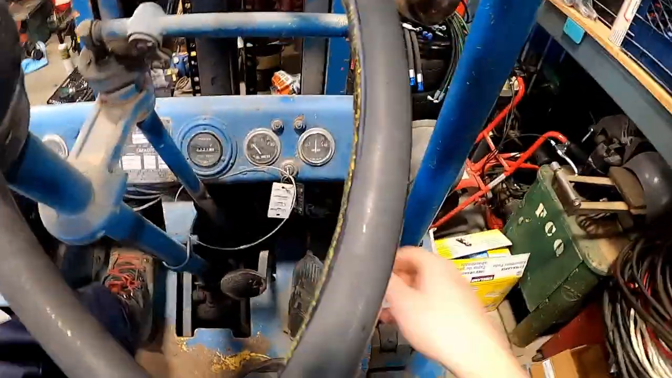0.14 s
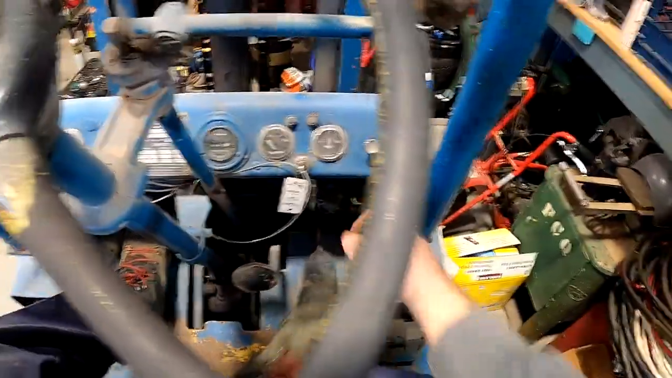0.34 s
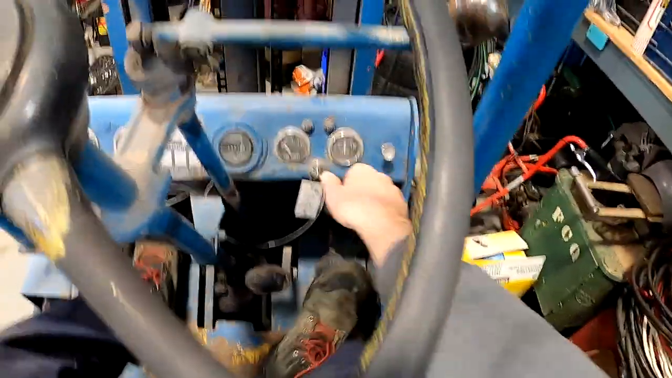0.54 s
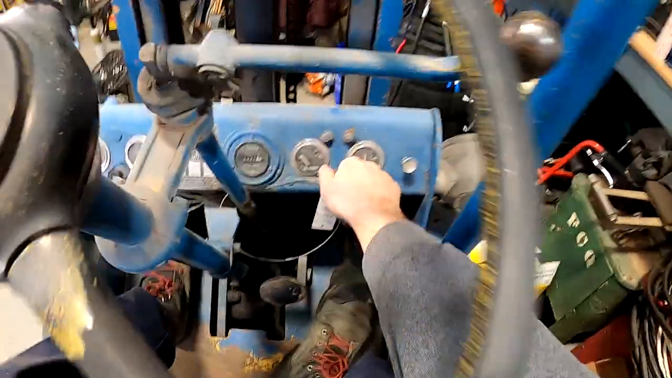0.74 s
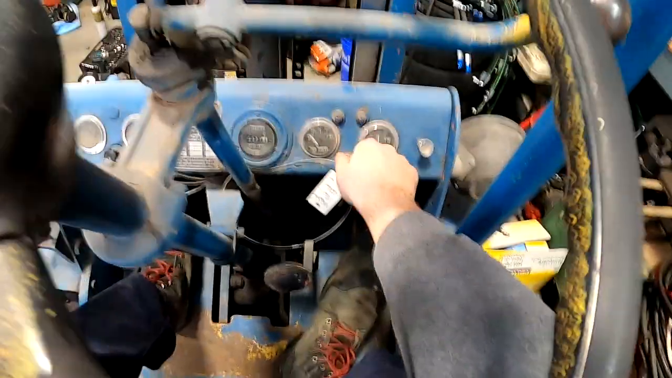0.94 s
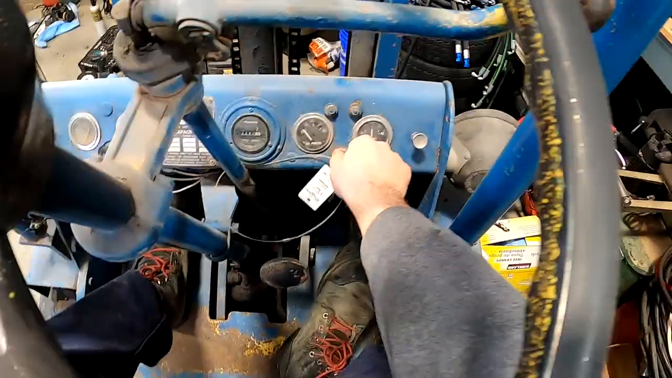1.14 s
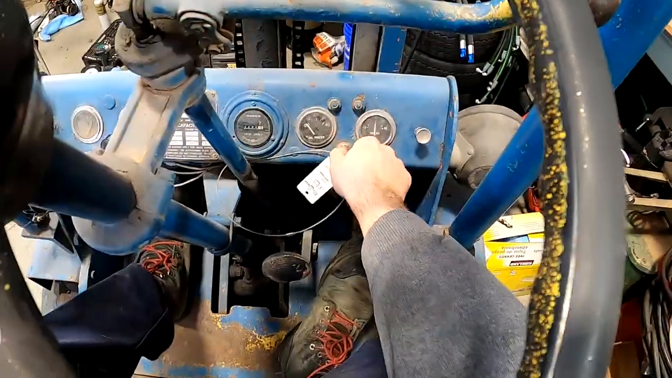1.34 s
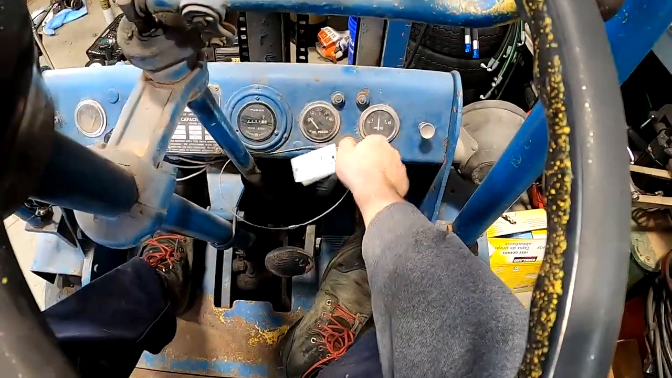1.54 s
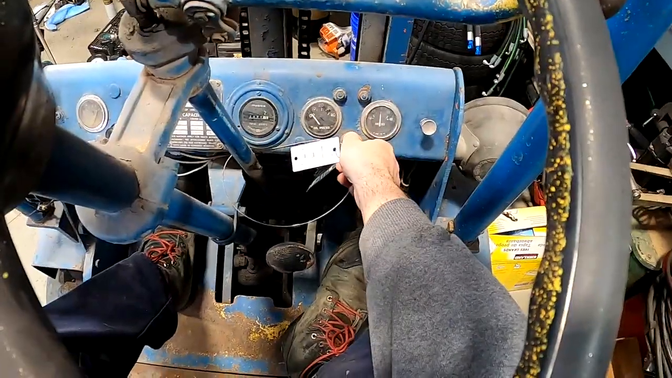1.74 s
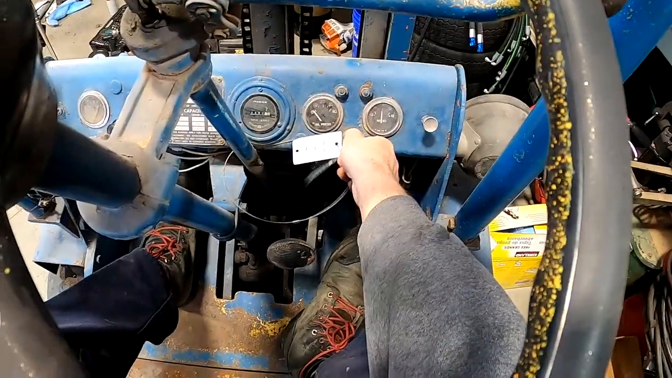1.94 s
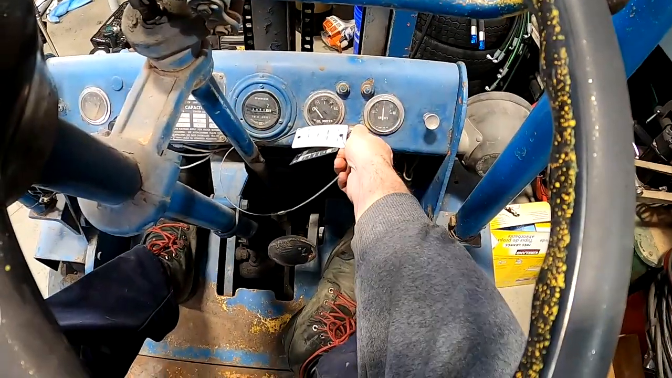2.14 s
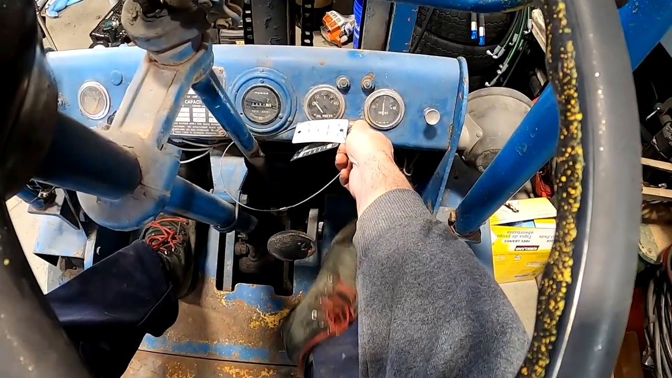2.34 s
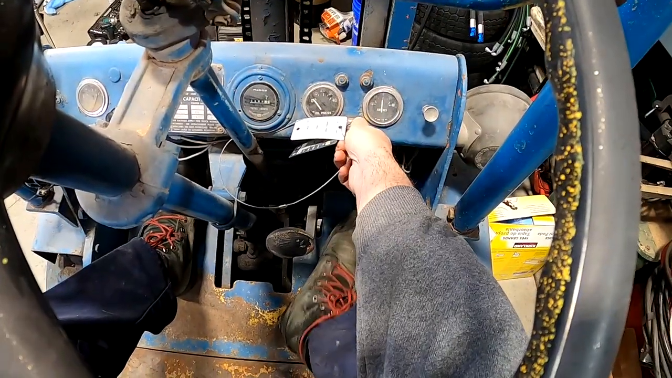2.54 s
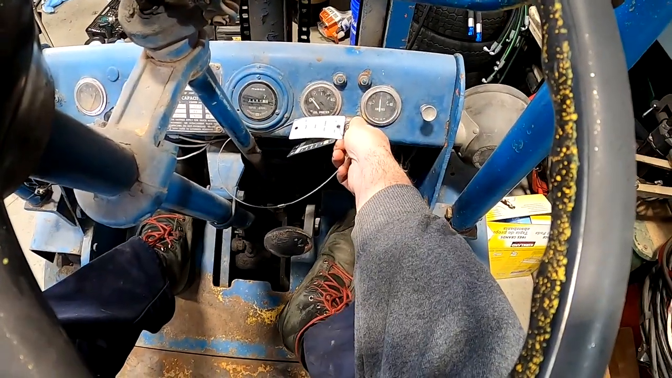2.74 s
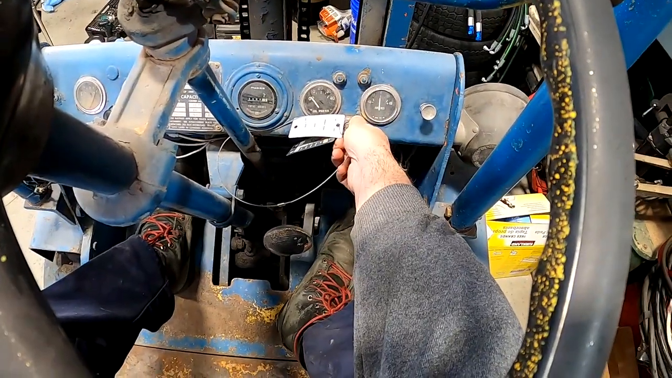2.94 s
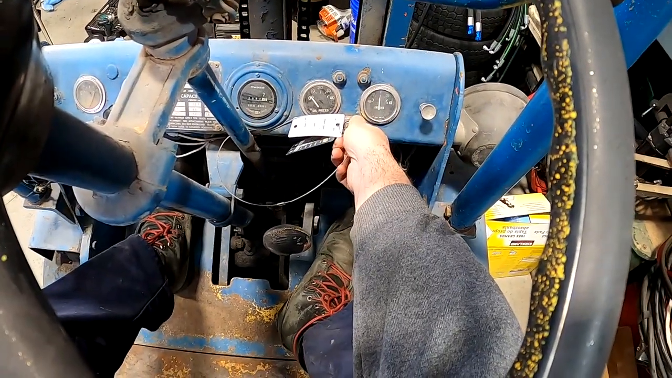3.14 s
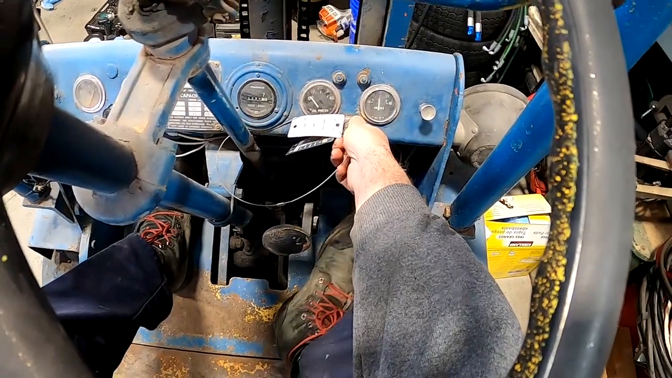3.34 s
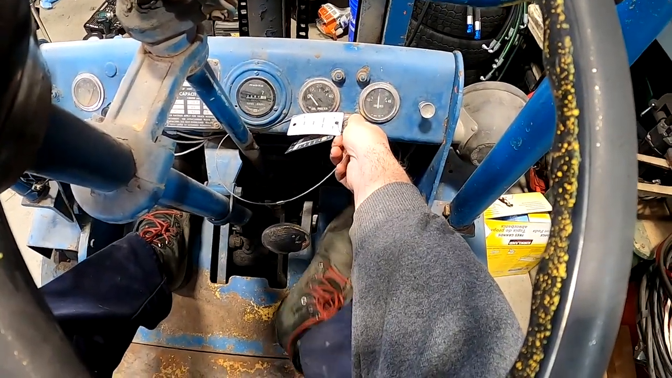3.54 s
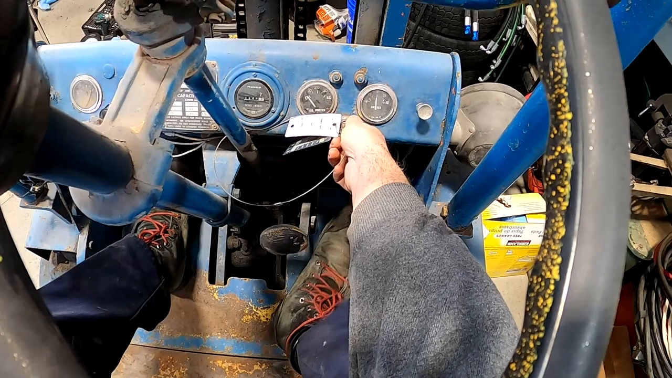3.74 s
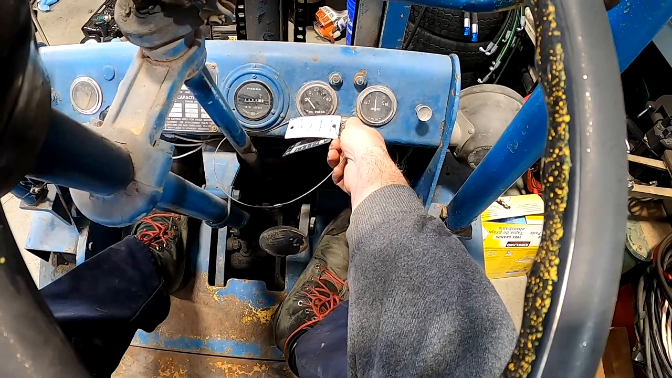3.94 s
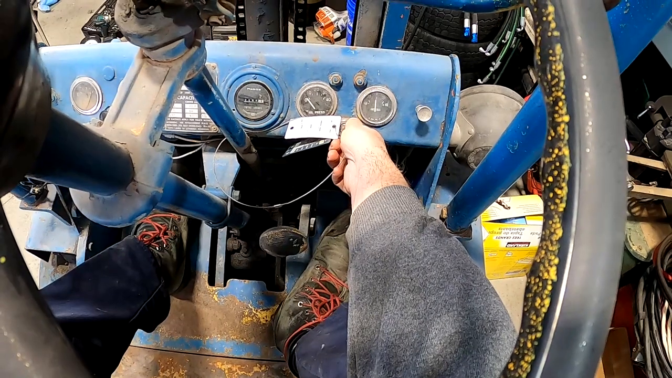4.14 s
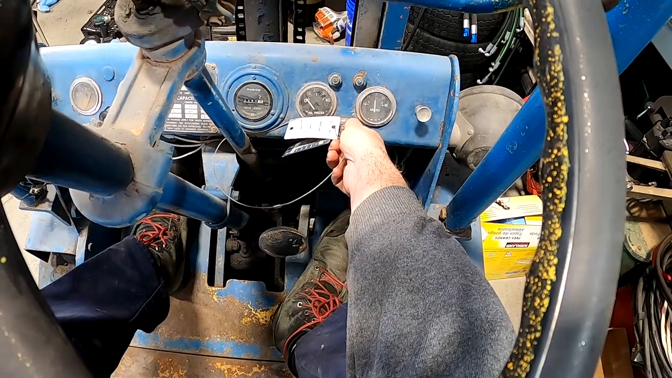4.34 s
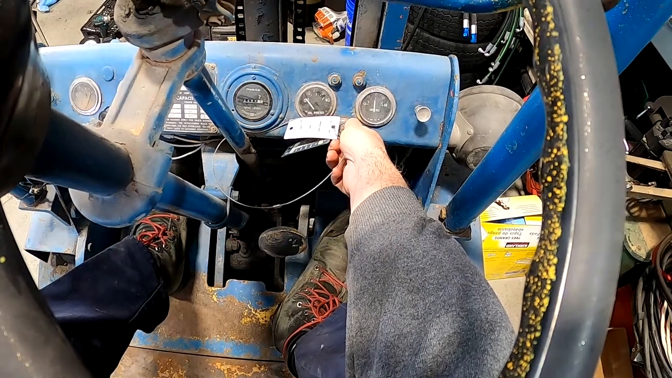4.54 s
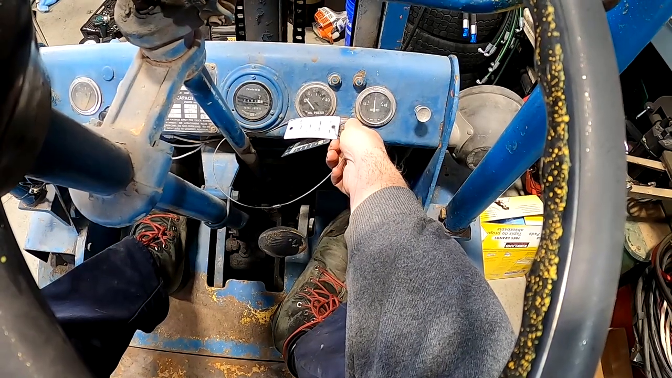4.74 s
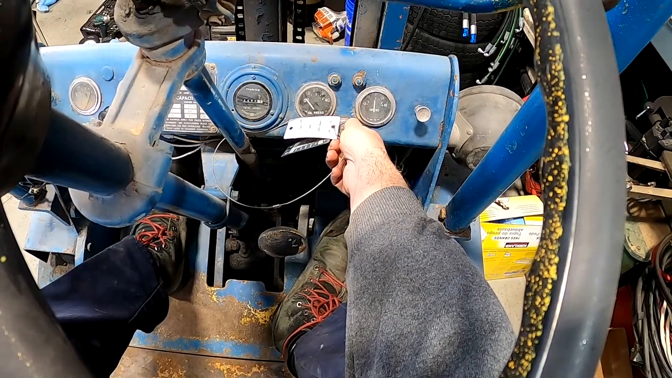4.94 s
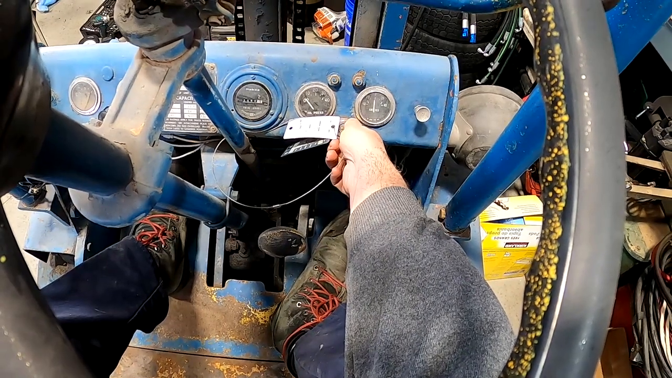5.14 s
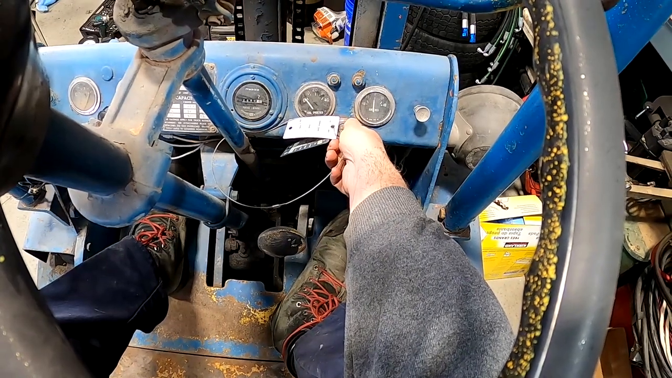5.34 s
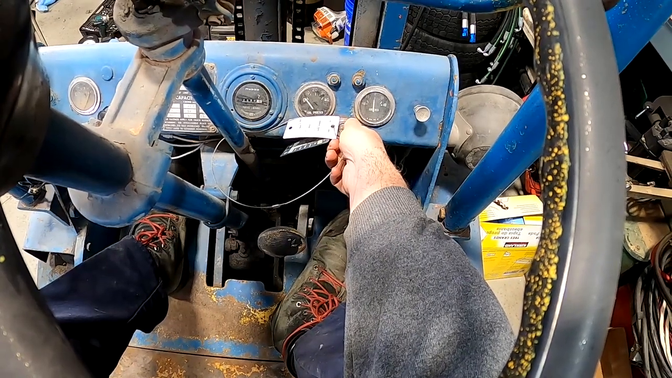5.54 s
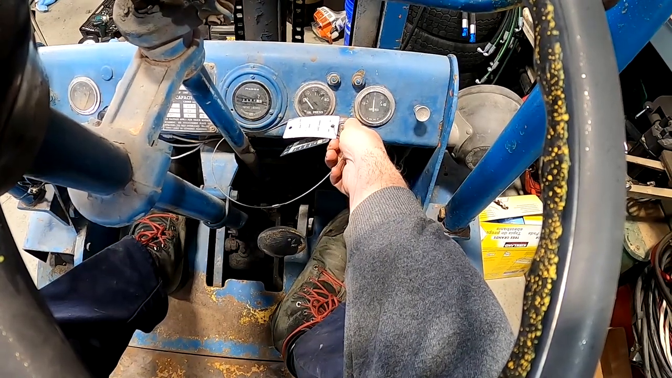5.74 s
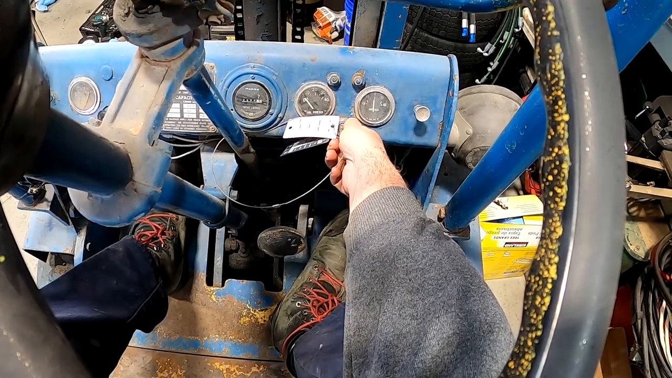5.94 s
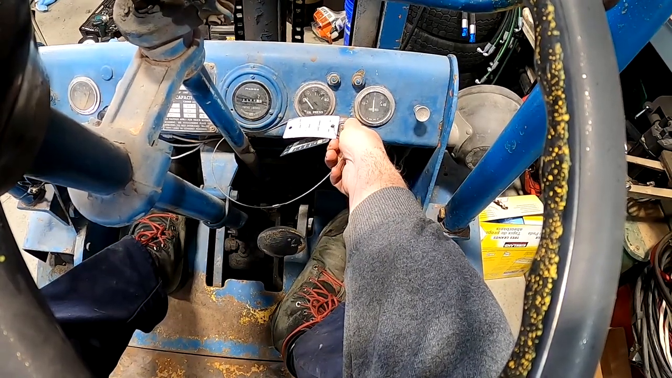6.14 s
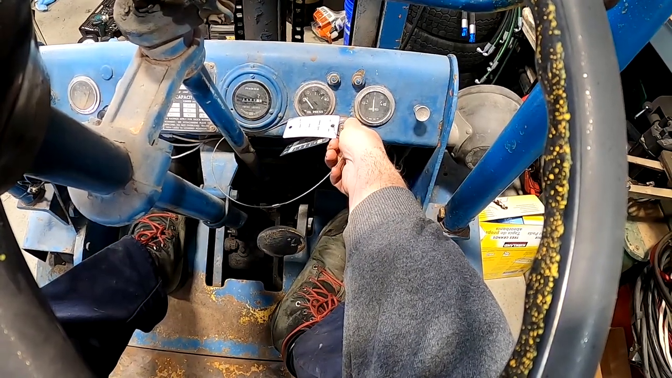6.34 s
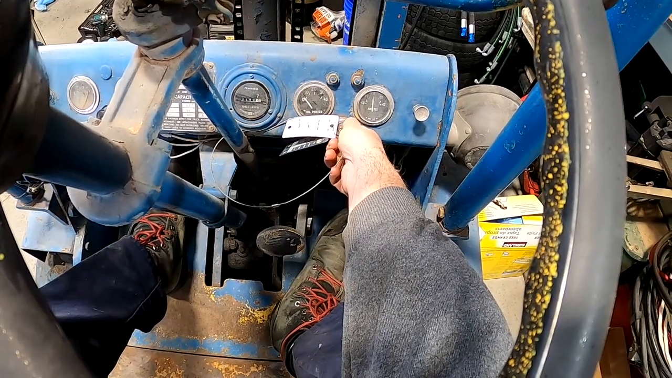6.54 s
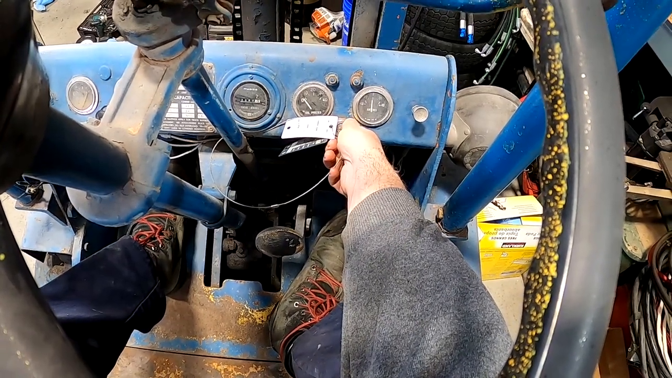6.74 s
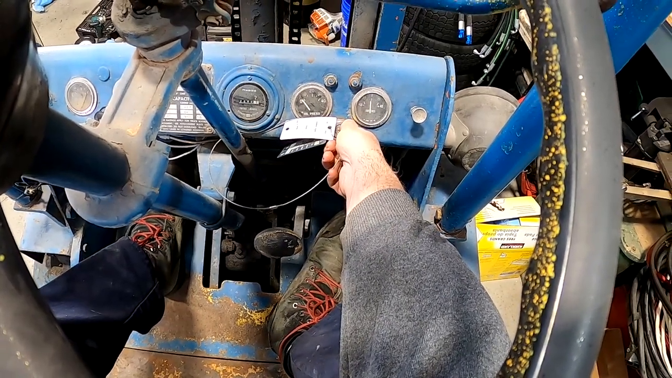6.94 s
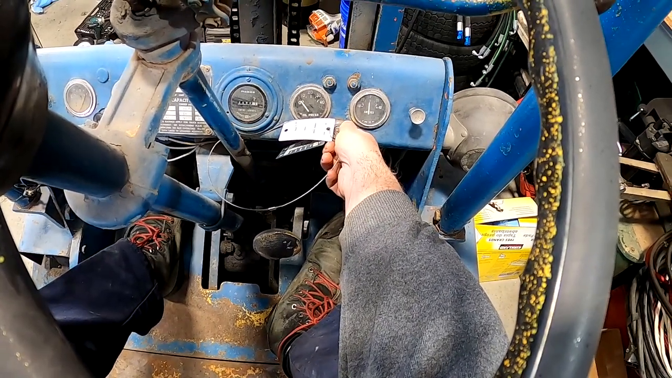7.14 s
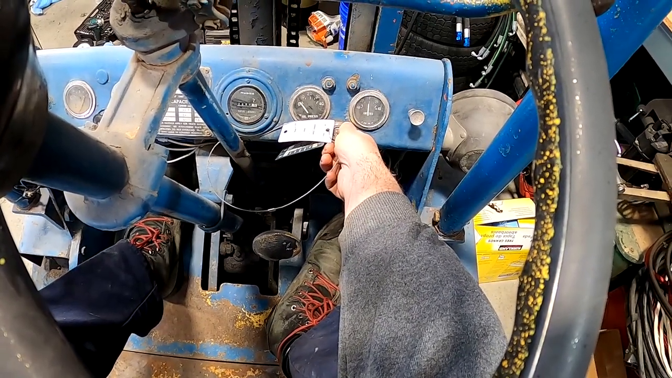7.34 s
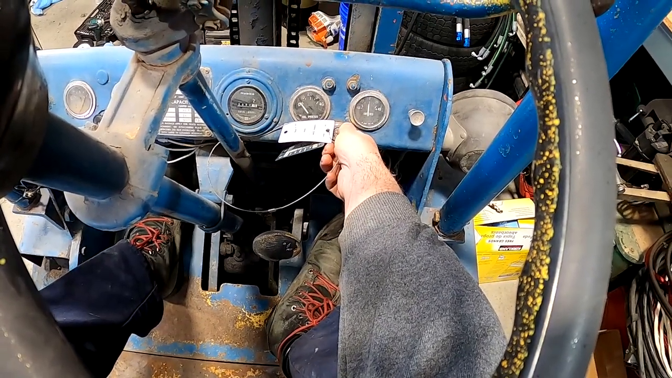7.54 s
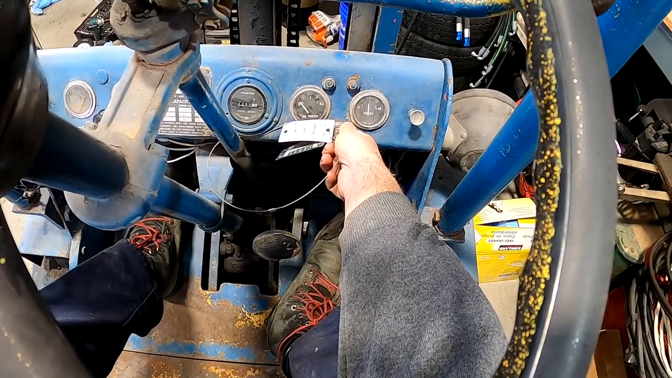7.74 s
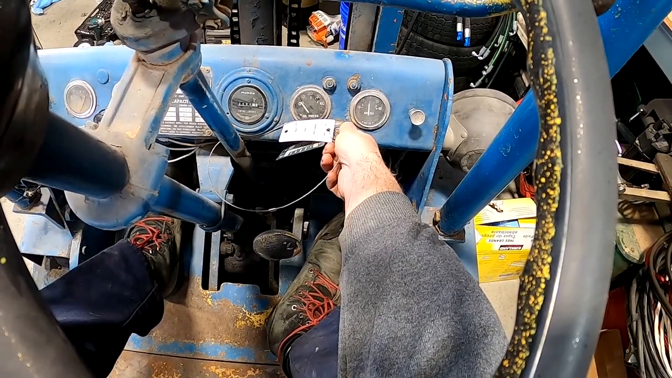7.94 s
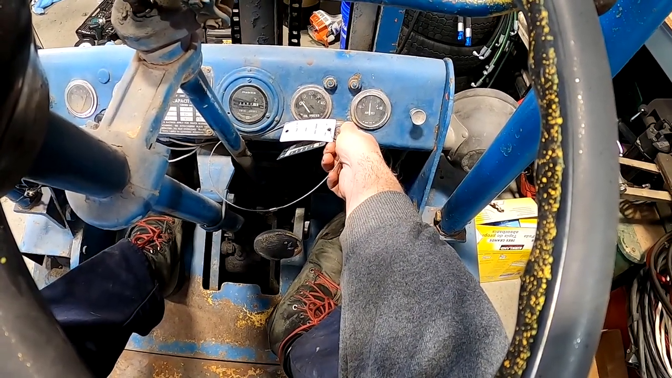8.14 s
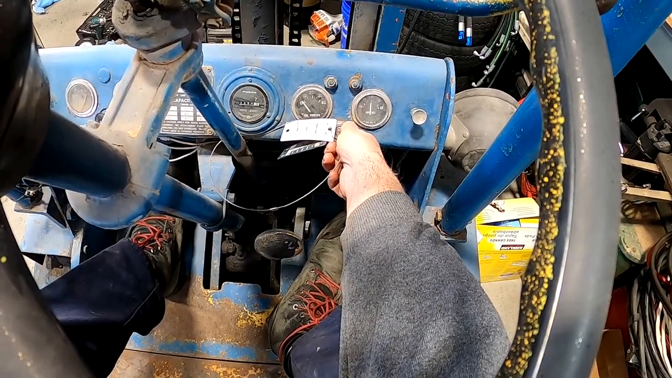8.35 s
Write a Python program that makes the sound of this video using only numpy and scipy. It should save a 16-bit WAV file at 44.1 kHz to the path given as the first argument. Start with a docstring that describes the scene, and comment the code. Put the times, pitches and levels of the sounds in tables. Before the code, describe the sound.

Close up in a cluttered garage, clothing rustles and a boot and hand knock a metal floor plate and dash. A sharp clack follows, then a starter engages with a metallic slam, runs up, and grinds steadily, whining and pulsing nearly six times a second with soft exhaust puffs. The engine never catches. Nearly mono, close microphone, faint hiss.

```python
"""A cluttered garage, a small industrial truck, and a starter motor whose engine does not catch.
Close by, clothes rustle (shaped noise) and a boot and hand knock plate and dash (ringing modes and short noise).
The key switch then pulls in a fuel valve with a clack, a solenoid follows and the pinion slams in (struck modes).
Last the pinion grinds the ring gear round (tooth-rate overtones, noise, resonances), slowing on each compression,
and the exhaust puffs once a stroke. The nearly mono pair of microphone ports adds faint self-noise."""
import sys
import numpy as np
from scipy import signal
from scipy.fft import rfft, irfft, next_fast_len
from scipy.io import wavfile
from scipy.ndimage import uniform_filter1d, map_coordinates

SR = 44100
rng = np.random.default_rng(int(sys.argv[2]) if len(sys.argv) > 2 else 0)


def digitize_waveform(pressure):
    """Quantize a signal to 16-bit integers and store it at the path in sys.argv[1].

    Rows of a 2-D input are taken as channels; values are limited to [-1, 1].
    """
    field = np.atleast_2d(pressure).T
    bounded = np.clip(field, -1, 1)
    quanta = np.round(bounded * 32767).astype(np.int16)
    wavfile.write(sys.argv[1], SR, quanta)


N = 374850
NOW_S = np.arange(N) / SR
START_S = 1.87  # the starter motor begins to turn


def amp(db):
    """dB to gain."""
    return 10 ** (np.asarray(db) / 20)


def unit(x):
    """Scaled to rms 1."""
    return x / np.sqrt(np.mean(x ** 2) + 1e-20)


def noise(length=N):
    """White noise, rms about 1."""
    return rng.standard_normal(length)


def along(points, hz):
    """Reads (frequency, value) points on a log frequency axis."""
    f, v = np.transpose(points)
    return np.interp(np.log(hz + 1), np.log(f + 1), v)


def curves(rows, at=NOW_S):
    """One value per sample for each column after the first."""
    s, *columns = np.transpose(rows)
    return [np.interp(at, s, column) for column in columns]


def wobble(rate):
    """A smooth random curve, rate knots a second."""
    knots = noise(int(N * rate / SR) + 4)
    return map_coordinates(knots, [np.arange(N) * rate / SR])


def filtered(x, response):
    """x times a response of frequency."""
    m = next_fast_len(N + SR // 2)
    return irfft(rfft(x, m) * response(np.fft.rfftfreq(m, 1 / SR)), m)[..., :N]


def coloured(x, spectrum):
    """x shaped by a spectrum, rms 1."""
    return unit(filtered(x, lambda hz: amp(along(spectrum, hz))))


def tail(decays, seconds):
    """A noise tail of energy 1, each frequency dying at its own speed (t60)."""
    hz, t, z = signal.stft(noise(int(seconds * SR)), SR, nperseg=256)
    fade = amp(-60 * t / along(decays, hz)[:, None])
    y = signal.istft(z * fade, SR, nperseg=256)[1]
    return y / np.linalg.norm(y)


def ring(modes, t, attack, rough_hz):
    """Modes of a struck thing, neighbours in opposite phase; a wandering phase blurs the higher ones."""
    drift = np.cumsum(rng.standard_normal((len(modes), len(t))), axis=1) * np.sqrt(rough_hz / SR)
    total = np.zeros(len(t))
    for k, (hz, db, t60) in enumerate(modes):
        level = amp(db + rng.normal(0, 1) - 60 * t / t60)
        total += (-1) ** k * level * np.sin(2 * np.pi * hz * t + drift[k] * hz / 1000)
    return (1 - np.exp(-t / attack)) * total


def singing(hz, width, db):
    """A loosely held resonance: narrow noise around a pitch that may move."""
    slow = [filtered(noise(), lambda f: 1 / (1 + (2 * f / width) ** 2)) for _ in range(2)]
    turn = 2 * np.pi * np.cumsum(hz) / SR
    return amp(db) * unit(slow[0] * np.cos(turn) + slow[1] * np.sin(turn))


def drone(hz, width, db, steady):
    """A lightly damped panel: narrow noise plus a steady tone whose phase wanders."""
    narrow = unit(filtered(noise(), lambda f: 1 / (1 + (2 * (f - hz) / width) ** 2)))
    tone = np.sin(2 * np.pi * hz * NOW_S + 1.41 * wobble(8))
    return amp(db) * (narrow + steady * tone)


def add(track, s, sound):
    """Mixes a sound into the track at time s."""
    part = track[round(s * SR):][:len(sound)]
    part += sound[:len(part)]


# dull air and cloth spectrum, also the low part of the rustle: hz, relative_db (per Hz)
DULL_SPECTRUM = [(15, -31), (25, 0), (162, -2), (261, 1.5), (468, -2), (546, -2), (595, -3), (977, -18),
                 (1500, -25), (1950, -21), (3300, -120)]


def room_tone():
    """The quiet garage never falls fully silent: a steady bed of dull noise."""
    return amp(-75.5) * coloured(noise(), DULL_SPECTRUM)


# how the garage dies away: hz, t60_s
GARAGE_DECAY = [(200, 0.53), (2000, 0.88), (10000, 0.17)]


def garage_echo(blows):
    """The walls answer the blows about 11 ms later with a dying noise tail."""
    late_tail = np.pad(tail(GARAGE_DECAY, .9), (500, 0))
    return amp(-15.0) * signal.fftconvolve(blows, late_tail)[:N]


# side signal against mid: hz, side_db
SIDE_SPREAD = [(60, -31), (200, -59), (700, -84), (2300, -76), (4300, -55), (8000, -30), (14000, -22)]
# microphone self-noise, unlike in the two ports: hz, relative_db (per Hz)
SELF_NOISE = [(18, -29), (30, 9), (149, 1), (411, -14), (1700, -18), (11200, -11), (13000, -17)]


def two_channels(mid):
    """Two nearly alike channels: a briefly smeared copy of the sound, shaped by frequency, and microphone self-
    noise are added to one channel and taken from the other."""
    smeared = signal.fftconvolve(mid, tail([(200, 0.01), (10000, 0.027)], .05))[:N]
    side = filtered(smeared, lambda hz: amp(along(SIDE_SPREAD, hz)))
    side += amp(-82.5) * coloured(noise(), SELF_NOISE)
    return np.array([mid + side, mid - side])


# course of the rustle before random sway: start_s, low_level_db, high_level_db
RUSTLE_COURSE = [(0.0, -64, -66), (0.218, -65, -65), (0.42, -65, -66.5), (0.5, -56, -60.5),
                 (0.625, -62, -63.5), (0.66, -54, -73), (0.696, -61, -69), (0.78, -68, -72.5),
                 (1.192, -77, -78.5), (1.452, -71, -80), (1.588, -66.5, -72), (1.698, -69, -77),
                 (1.87, -66, -76)]
# crisp high part of the rustle: hz, relative_db (per Hz)
CLOTH_SPECTRUM = [(470, -26), (800, 3), (1960, -8), (2160, -8.5), (2630, -7), (3440, -10), (3890, -9.5),
                  (4350, -10.5), (15000, -18.5)]
# two faint whistling bands in the first rustle: start_hz, rise_hz_per_s, width_hz, level_db
CLOTH_WHISTLES = [(2350, 900, 90, -81), (3700, 800, 110, -76)]
WHISTLE_S, WHISTLE_LENGTH_S = .25, .16  # middle, half length


def clothes():
    """Rubbing cloth: a dull and a crisp noise swell and settle together, with faint rising whistles."""
    low_db, high_db = curves(RUSTLE_COURSE)
    sway = wobble(3.6)
    low = amp(low_db + .8 * sway + 1.8 * wobble(30)) * coloured(noise(), DULL_SPECTRUM)
    high = amp(high_db + .6 * sway + 1.2 * wobble(40)) * coloured(noise(), CLOTH_SPECTRUM)
    swell = np.exp(-((NOW_S - WHISTLE_S) / WHISTLE_LENGTH_S) ** 2)
    whistles = sum(singing(hz + rise * np.minimum(NOW_S, 1), width, db)
                   for hz, rise, width, db in CLOTH_WHISTLES)
    return low + high + swell * whistles


# boot and hand contacts: start_s, plate_level_db, thud_level_db, thud_hz, scuff_level_db, length_s
CONTACTS = [(0.411, -39, -46, 330, -60, 0.014), (0.427, -40, -46, 330, -48, 0.02),
            (0.436, -39, -45, 330, -48, 0.02), (0.448, -50, -54, 330, -68, 0.018),
            (0.637, -50, -48, 1100, -54, 0.05), (0.648, -54, -47, 1250, -54, 0.04),
            (0.718, -64, -62, 600, -80, 0.015), (0.867, -71, -60, 850, -80, 0.022),
            (0.944, -76, -68, 1600, -70, 0.03), (1.029, -74, -70, 2200, -65, 0.025),
            (1.662, -66, -56, 850, -82, 0.022)]
# modes of the floor plate, before the extra damping of the knock: pitch_hz, level_db, t60_s
PLATE_MODES = [(106, -9, 0.23), (164, -2.5, 0.46), (269, 0.5, 0.15), (413, 6.5, 0.087), (627, -9, 0.2),
               (907, -11, .3), (1237, -11, 0.29), (1790, -12, 0.19)]
THUD_WIDTH_HZ = 920


def boot_and_hand():
    """Each contact rings the floor plate, thuds as damped resonant noise and scuffs as high noise."""
    out, t = np.zeros(N), np.arange(SR // 3) / SR
    pole = np.exp(-np.pi * THUD_WIDTH_HZ / SR)
    for s, plate_db, thud_db, thud_hz, scuff_db, length in CONTACTS:
        fade = np.exp(-3 * t / max(length, .002))
        resonator = [1, -2 * pole * np.cos(2 * np.pi * thud_hz / SR), pole ** 2]
        thud = unit(signal.lfilter([1], resonator, noise(len(t)))) * fade
        scuff = signal.lfilter([.2], [1, -1.5, .66], np.diff(noise(len(t) + 1))) * fade
        plate = ring(PLATE_MODES, t, 0.00039, rough_hz=306) * amp(-60 * t / 0.16)
        add(out, s, amp(plate_db) * plate + amp(thud_db) * thud + amp(scuff_db) * scuff)
    return out


# key contact, fuel valve, solenoid: start_s, crack_level_db, ring_level_db
PLUNGER_CLACKS = [(1.414, -81.5, -46), (1.4294, -27, -25.5), (1.869, -35.5, -53.5)]
# modes of the bracket they shake: pitch_hz, level_db, t60_s
BRACKET_MODES = [(388, -1, .07), (430, 0, .07), (1640, -25, .08), (2520, -30, .35), (2780, -30, .45),
                 (3250, -28, .1), (4210, -29, .2), (4554, -29, .35), (5510, -25, .17), (6450, -31, .25),
                 (7310, -28, .3), (8150, -29, .25)]


def solenoids():
    """Steel plungers land with a short rattle and shake their bracket."""
    out, t = np.zeros(N), np.arange(SR // 3) / SR
    for s, crack_db, ring_db in PLUNGER_CLACKS:
        rattle = signal.lfilter([1, -1], [1, -.9, .35], noise(len(t)))
        # the upper bracket modes sound in the crack too
        crack = 0.5 * rattle + 9 * ring(BRACKET_MODES[2:], t, .001, rough_hz=80)
        crack *= (1 - np.exp(-t / 0.003)) * amp(-60 * t / 0.048)
        add(out, s, amp(crack_db) * crack)
        add(out, s + 0.0045, amp(ring_db) * ring(BRACKET_MODES, t, 0.0015, rough_hz=45))
    return out


# modes of the struck ring gear: pitch_hz, level_db, t60_s
RING_GEAR_MODES = [(533, 1, .07), (950, -8, .05), (1480, 2, 0.052), (2110, -12, .06)]


def pinion_landing():
    """The pinion slams into the ring gear, which rings briefly."""
    out, t = np.zeros(N), np.arange(SR // 3) / SR
    add(out, 1.899, amp(-30.5) * ring(RING_GEAR_MODES, t, 0.0025, rough_hz=100))
    return out


STROKE_COUNT, EARLY_STROKE_S, FIRST_STROKE_S = 37, 2.075, 2.275
STROKE_S, LONGER_S = .16275, .00059  # basic stroke length, growth per stroke as the battery tires
LAG_S, LAG_STROKES = .0582, 1.2  # time lost while the crank gets going, over about so many strokes
EARLY_PUFF_DB, FIRST_PUFF_DB = -63, -40.5
PUFF_DB, PUFF_FADES_DB, PUFF_SCATTER_DB = -43, 0.07, 0.5  # later puffs, loss per stroke, chance
HOOD_DB, HOOD_LATE_DB, HOOD_STROKES = 4.5, 5, 12.5  # the hood ring grows by HOOD_LATE_DB as cranking slows
HOOD_ALTERNATES_DB, HOOD_SCATTER_DB = 1.3, 0.73  # every other stroke rings the hood harder
WHINE_SCATTER_DB = .7
EARLY_HOOD_DB, EARLY_WHINE_DB = -6, 2.5  # the slow first stroke whines steadily and hardly rings the hood


def strokes():
    """One row per compression stroke, each longer as the battery tires: time, puff, hood and gear force dB."""
    k = np.arange(STROKE_COUNT)
    lag = LAG_S * (1 - np.exp(-k / LAG_STROKES))
    s = FIRST_STROKE_S + STROKE_S * k + LONGER_S * k * (k - 1) / 2 + lag
    scatter = [PUFF_SCATTER_DB, HOOD_SCATTER_DB, WHINE_SCATTER_DB]
    puff_chance, hood_chance, force_db = (rng.standard_normal((STROKE_COUNT, 3)) * scatter).T
    puff_db = np.where(k > 0, PUFF_DB - PUFF_FADES_DB * k + puff_chance, FIRST_PUFF_DB)
    hood_db = HOOD_DB - HOOD_LATE_DB * np.exp(-k / HOOD_STROKES)
    hood_db += hood_chance - HOOD_ALTERNATES_DB * (-1) ** k
    early = [EARLY_STROKE_S, EARLY_PUFF_DB, EARLY_HOOD_DB, EARLY_WHINE_DB]
    return np.vstack([early, np.c_[s, puff_db, hood_db, force_db]])


# the pipe booms on the first strokes: start_s, pitch_hz, level_db
PIPE_BOOMS = [(1.89, 199, -46), (2.084, 189, -33.5), (2.31, 197, -32.5), (2.5, 192, -54)]


def exhaust(rows):
    """Each opening valve sends one soft pressure pulse down the pipe; the first strokes also boom it."""
    out, t = np.zeros(N), np.arange(SR // 10) / SR
    u = t - .022
    # sharp front, slower back swing
    swell = np.exp(-(u / np.where(u < 0, .007, .016)) ** 2)
    pulse = np.cos(2 * np.pi * (62 * u - 600 * u ** 2) - .3) * swell
    for s, puff_db, _, _ in rows[:-1]:
        add(out, s, amp(puff_db) * pulse)
    for s, hz, db in PIPE_BOOMS:
        boom = np.sin(2 * np.pi * hz * t) * np.exp(-((t - .05) / 0.025) ** 2)
        add(out, s - .05, amp(db) * boom)
    return out * (NOW_S >= START_S)


BACKLASH_DB, BACKLASH_WEAK_DB = -28.5, -30.5  # strong and weak strokes alternate, before the gear force


def backlash(rows):
    """As a piston passes over the top the gears take up their slack: a short falling knock."""
    out, t = np.zeros(N), np.arange(SR // 20) / SR
    u = t - .025
    chance = rng.standard_normal((len(rows), 2))
    for k, (s, _, _, force_db) in enumerate(rows[2:-1], 1):
        hz = 850 * (1 + 0.028 * chance[k, 0])
        knock = np.cos(2 * np.pi * (hz * u - 4500 * u ** 2))
        knock += 0.45 * np.cos(2 * np.pi * (0.638 * hz * u - 1600 * u ** 2))
        level_db = force_db + (BACKLASH_WEAK_DB if k % 2 else BACKLASH_DB)
        add(out, s - .019 + 0.00294 * chance[k, 1], amp(level_db) * knock * np.exp(-(u / 0.014) ** 2))
    return out


# block and sheet-metal resonances that lift or absorb the grinding: pitch_hz, width_hz, peak_db
PANEL_RESONANCES = [(288, 49, 1.5), (360, 31, 4), (434, 20, 7), (673, 28, 1), (762, 3.6, 12.5),
                    (840, 17, 4.5), (967, 7.9, 7), (1334, 18, 7.5), (1613, 33, 6), (1957, 28, 5),
                    (2086, 53, 4.5), (2487, 27, 3), (9350, 180, 4)]


def panels(hz):
    """Gain of the resonant panels over the broad spectrum."""
    return amp(sum(db / (1 + (2 * (hz - c) / w) ** 2) for c, w, db in PANEL_RESONANCES))


# one stroke after the puff, before pace and run-up scale the pitches:
# stroke_share, tooth_rate_hz, loudest_whine_hz, whine_db, grind_db, hood_ring_db
STROKE_COURSE = [(0, 405, 800, -1, -1, -13), (.12, 390, 780, 0, -2.3, -16), (.3, 372, 740, -2, -1.4, -12),
                 (.36, 368, 730, -12, -.4, -8), (.41, 366, 2000, -12, .3, -8), (.5, 362, 1820, -3, 1, -3),
                 (.6, 352, 1430, -3, 1.1, 0), (.66, 350, 1300, -4, 1.1, 0), (.7, 500, 1020, -1, 1.1, 0),
                 (.8, 472, 945, 0, 1, -3), (.9, 428, 855, 0, .3, -10), (1, 405, 800, -1, -1, -13)]
# the motor gets going: start_s, share_of_cranking_speed, brightness (0-1), extra_growl_db
MOTOR_RUN_UP = [(1.87, .6, 0, 0), (1.96, .86, .3, 6), (2.03, .99, .5, 10), (2.1, 1.09, .7, 6),
                (2.16, 1.19, 1, 0), (2.21, 1.24, 1, 0), (2.245, 1.11, 1, 0), (2.33, 1.1, 1, 0),
                (2.47, 1.1, 1, 0), (2.65, 1, 1, 0)]
EARLY_TOOTH_HZ = 390  # the first stroke meets little compression; before pace and run-up


def crank_motion(rows):
    """Compression sets tooth rate, loudest whine pitch and the whine, grind and hood levels in each stroke."""
    count = np.interp(NOW_S, rows[:, 0] + .025, np.arange(len(rows)))
    stroke, early = count.astype(int), count < 1
    tooth_hz, loud_hz, whine_db, grind_db, hood_db = curves(STROKE_COURSE, count % 1)
    hood_db += uniform_filter1d(rows[stroke, 2], size=800)
    whine_db = whine_db * ~early + uniform_filter1d(rows[stroke, 3], size=800)
    speed = curves(MOTOR_RUN_UP)[0]
    # strokes per second against 5.7
    pace = 1 / np.interp(NOW_S, rows[1:, 0], np.diff(rows[:, 0])) / 5.7
    tooth_hz = uniform_filter1d(np.where(early, EARLY_TOOTH_HZ, tooth_hz), size=300) * pace * speed
    loud_hz = np.where(early, 2 * tooth_hz, loud_hz)
    return count, pace, tooth_hz, loud_hz, whine_db, grind_db, hood_db


PINION_TEETH, PINION_WOBBLE = 9, .45  # the pinion runs out of true: the whine swells once a turn by this share
SWEEP_WIDTH_HZ, SWEEP_DB = 45, -9  # a narrow band of rasp follows the loudest whine


def gear_whine(teeth, tooth_hz, loud_hz, pace, whine_db):
    """Overtones of the tooth rate; the harder the teeth meet, the higher the one that stands out."""
    whine = np.zeros(N)
    for k in range(1, 7):
        waver = amp(.9 * wobble(40))  # worn teeth make each overtone waver
        stand_out = 1 / (1 + (np.log(k * tooth_hz / loud_hz) / 0.2) ** 2)
        whine += np.cos(2 * np.pi * k * teeth) * waver * stand_out
    whine *= 1 + PINION_WOBBLE * np.cos(2 * np.pi * teeth / PINION_TEETH + wobble(6))
    sweep = singing(uniform_filter1d(loud_hz, size=300) * pace, SWEEP_WIDTH_HZ, SWEEP_DB)
    return filtered((unit(whine) + sweep) * amp(whine_db), panels)


# low grinding: hz, relative_db (per Hz)
BODY_SPECTRUM = [(15, -53), (25, -21), (54, -25), (124, -22), (222, -9.5), (279, -2), (319, -2),
                 (346, -8.5), (382, -3), (482, -4.5), (628, -4), (741, -1), (950, -5.5), (1200, -15.5),
                 (1300, -14.5), (1690, -16.5), (2860, -120)]
# hood rings under load: pitch_hz, width_hz, level_db
HOOD_RINGS = [(352.6, 45, -10.5), (712, 43, -16.5)]
WHINE_DB = -7


def starter_body(whine, teeth, hood_db):
    """Low grinding with whine, dull and growling until the motor is up to speed; hood and frame drone."""
    _, bright, growl_db = curves(MOTOR_RUN_UP)
    low_force = filtered(noise() * amp(0.88 * wobble(25)), panels)
    grind = coloured(low_force, BODY_SPECTRUM)
    dull = filtered(grind, lambda hz: 3.0 / (1 + (hz / 380) ** 2.1))
    growl = (amp(growl_db) - 1) * .7 * np.cos(2 * np.pi * teeth) * amp(1.5 * wobble(40))
    hood = amp(hood_db) * sum(drone(*mode, steady=3.28) for mode in HOOD_RINGS)
    # the frame rings all the time, a little less when the hood rings hard
    frame = amp(-.3 * hood_db - 3.5) * drone(291, width=14, db=-10.5, steady=0.75)
    return bright * (grind + amp(WHINE_DB) * whine + hood + frame) + (1 - bright) * dull + growl


# high grinding: hz, relative_db (per Hz)
TREBLE_SPECTRUM = [(530, -56), (900, -4.5), (1190, -8), (1590, -5.5), (1760, -5.5), (2130, -5.5),
                   (2290, -7.5), (2630, -6.5), (2860, -11.5), (3370, -16), (4270, -16), (4690, -20),
                   (5220, -21), (13600, -34.5), (15100, -41)]
# gear and casing modes that sing when the teeth are loaded: pitch_hz, width_hz, level_db
GEAR_MODES = [(1320, 52, -18), (1580, 78, -14), (1735, 35, -19.5), (1884, 22, -16), (2116, 45, -13),
              (2570, 69, -17), (2690, 69, -17), (3670, 28, -30), (4200, 50, -27), (4310, 60, -29.5),
              (5160, 220, -27), (6540, 200, -28.5)]
GEARS_SWELL, GEARS_WAVER = 2.5, .009  # swing over the grind's swing, share of pitch wander
HOUSING_HZ, HOUSING_WIDTH_HZ, HOUSING_DB = 4290, 130, -22  # starter housing sings with the grind
HOUSING_SWING_HZ, HOUSING_HIGH_AT = 110, .9  # wavers once a stroke, highest at this share of it
RASP_DB, RASP_TOP_DB, RASP_TOP_HZ = .6, 1.1, 3500  # uneven teeth: the grind flutters, more so in the highs


def starter_treble(count, grind_db):
    """High grinding and singing gears and housing, scattered by the clutter and fluttering with uneven teeth."""
    bright = curves(MOTOR_RUN_UP)[1]
    force = noise() * amp(grind_db + RASP_DB * wobble(35) + 1.06 * wobble(90))
    grind = coloured(filtered(force, panels), TREBLE_SPECTRUM)
    housing_hz = HOUSING_HZ + HOUSING_SWING_HZ * np.cos(2 * np.pi * (count - HOUSING_HIGH_AT))
    metal = singing(housing_hz, HOUSING_WIDTH_HZ, HOUSING_DB)
    for hz, width, db in GEAR_MODES:
        metal += amp(1.6 * wobble(25)) * singing(hz * (1 + GEARS_WAVER * wobble(9)), width, db)
    treble = grind + bright * amp(GEARS_SWELL * grind_db) * metal
    # clutter around the truck scatters the treble into a fixed fine comb
    clutter = tail([(200, 0.64), (10000, 1.0)], 0.38)
    treble = unit(treble + 0.57 * signal.fftconvolve(treble, clutter)[:N])
    highs = filtered(treble, lambda hz: 1 / (1 + (RASP_TOP_HZ / (hz + 1)) ** 4))
    return treble + (amp(RASP_TOP_DB * wobble(28)) - 1) * highs


# level of the starter as it engages: start_s, body_level_db, treble_level_db
ENGAGE_LEVELS = [(1.87, -63, -56), (1.878, -45, -38), (1.908, -34, -44), (1.922, -39, -47.5),
                 (2.016, -34.5, -40), (2.216, -32.5, -34.5), (2.316, -33, -36.5), (2.43, -33, -35),
                 (2.55, -34, -34.5)]
BODY_SAG_DB_PER_S, TREBLE_SAG_DB_PER_S = 0.0657, 0.14


def starter(rows):
    """Pinion teeth beat on the ring gear; their rate and force follow the compression in each stroke."""
    count, pace, tooth_hz, loud_hz, whine_db, grind_db, hood_db = crank_motion(rows)
    # running count of teeth, with a slightly unsteady rate
    teeth = np.cumsum(tooth_hz * (1 + .011 * wobble(60) + .012 * wobble(8))) / SR
    whine = gear_whine(teeth, tooth_hz, loud_hz, pace, whine_db)
    body = starter_body(whine, teeth, hood_db)
    treble = starter_treble(count, grind_db)
    body_db, treble_db = curves(ENGAGE_LEVELS)
    tiring_s = np.maximum(NOW_S - ENGAGE_LEVELS[-1][0], 0)
    out = amp(body_db - BODY_SAG_DB_PER_S * tiring_s) * body
    out += amp(treble_db - TREBLE_SAG_DB_PER_S * tiring_s) * treble
    return out * (NOW_S >= START_S)


def scene():
    """Near sounds, the garage's answer to the blows, spread over two nearly alike channels with microphone
    self-noise."""
    rows = strokes()
    blows = boot_and_hand() + solenoids() + pinion_landing()
    mid = room_tone() + garage_echo(blows) + clothes() + blows
    mid += exhaust(rows) + backlash(rows) + starter(rows)
    return two_channels(mid)


def record(dry):
    """The microphone channel keeps nothing from its band limit of 15.1 kHz upward."""
    return filtered(dry, lambda hz: hz < 15100)


dry = scene()
out = record(dry)
digitize_waveform(out)
```